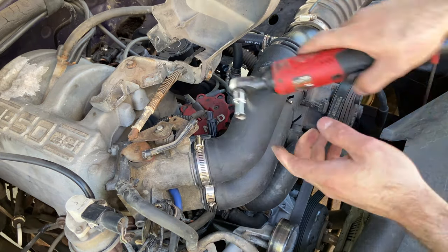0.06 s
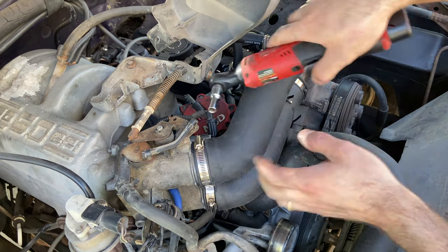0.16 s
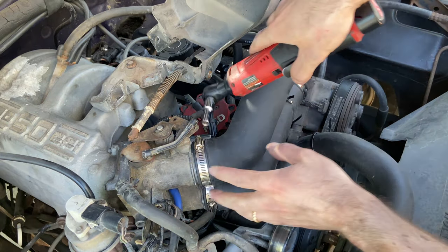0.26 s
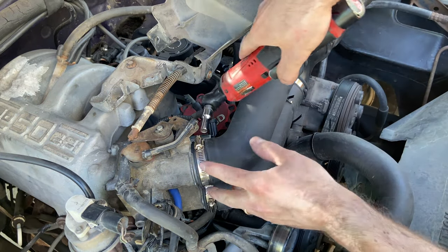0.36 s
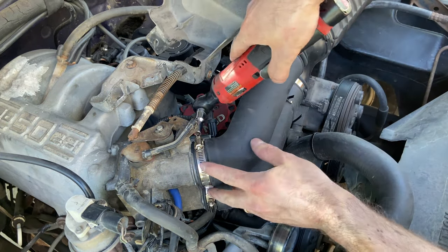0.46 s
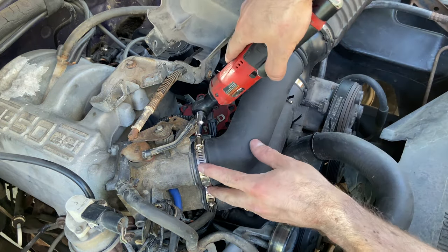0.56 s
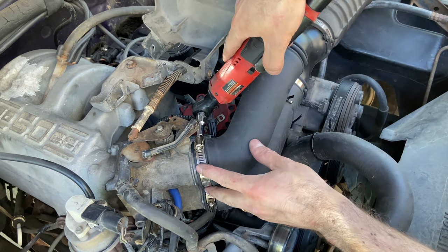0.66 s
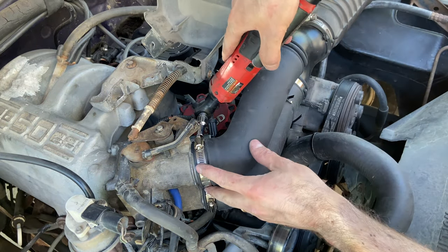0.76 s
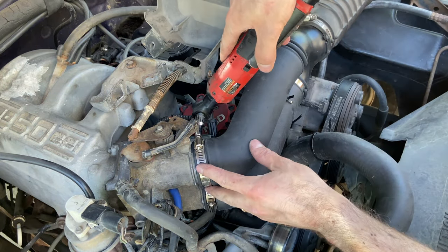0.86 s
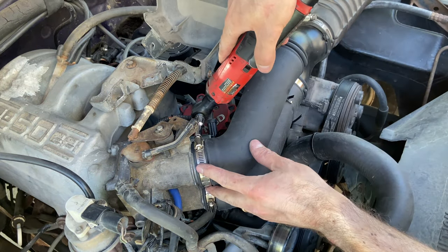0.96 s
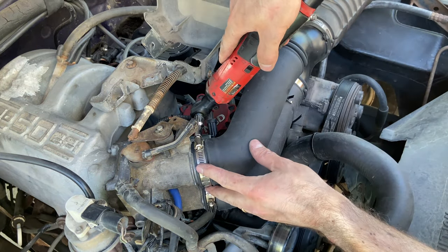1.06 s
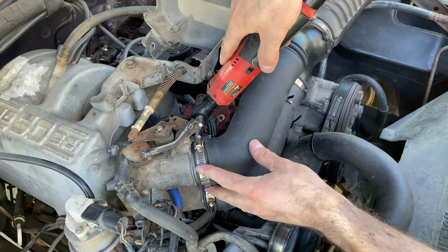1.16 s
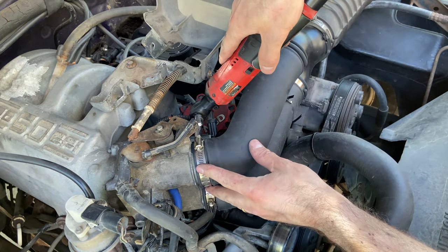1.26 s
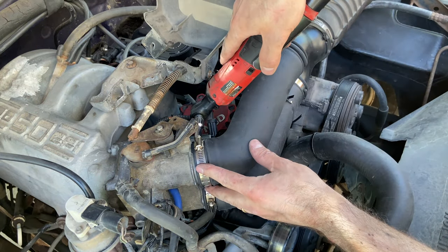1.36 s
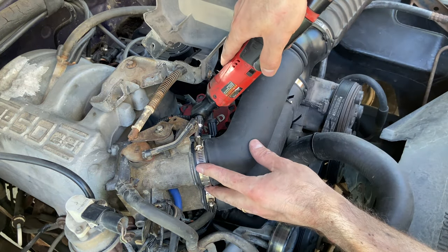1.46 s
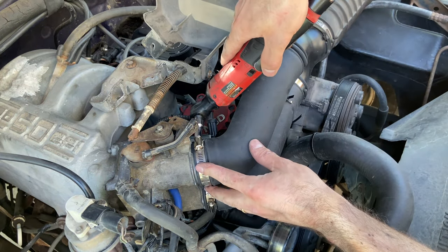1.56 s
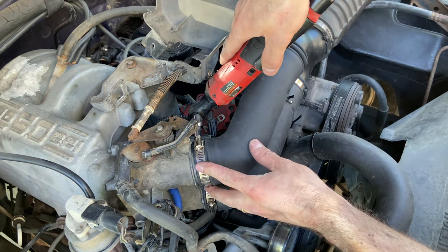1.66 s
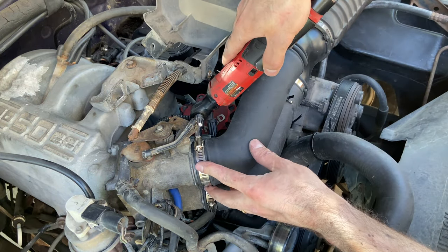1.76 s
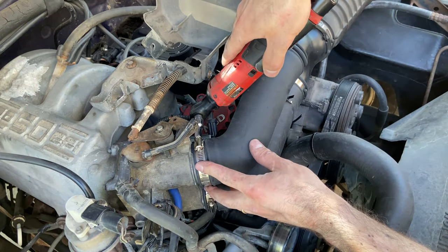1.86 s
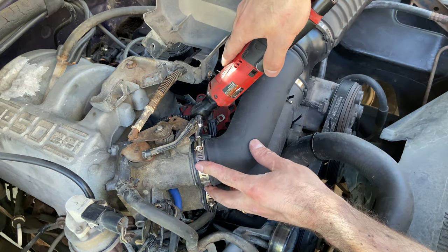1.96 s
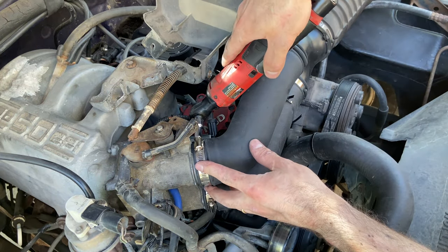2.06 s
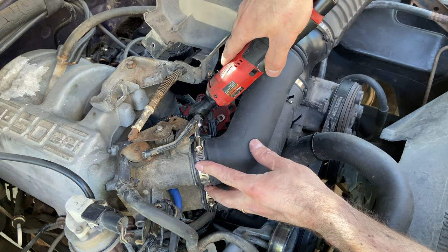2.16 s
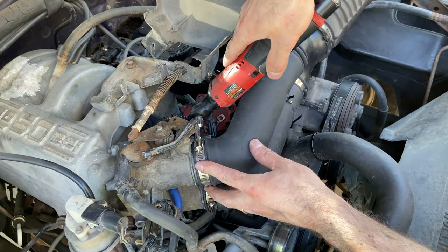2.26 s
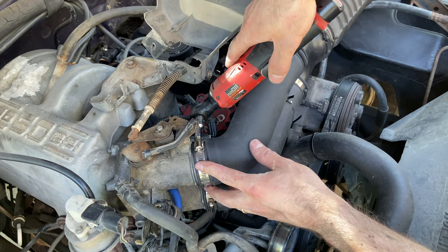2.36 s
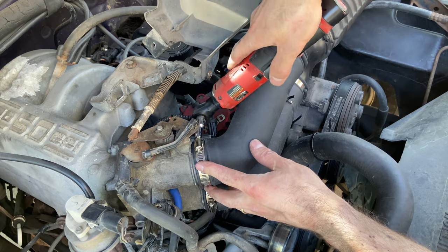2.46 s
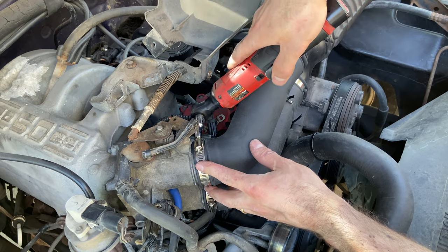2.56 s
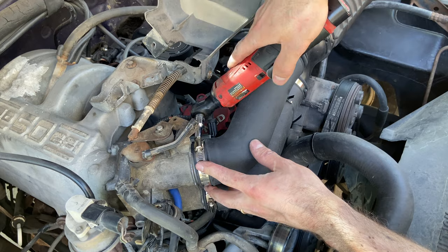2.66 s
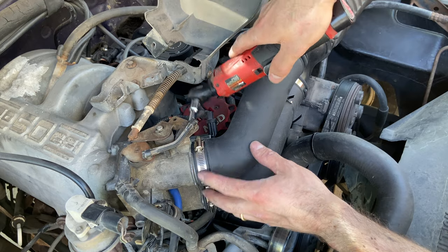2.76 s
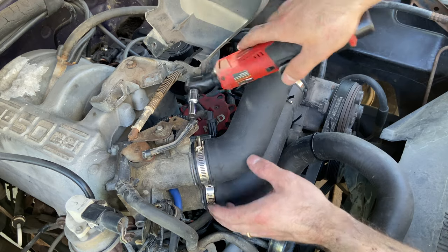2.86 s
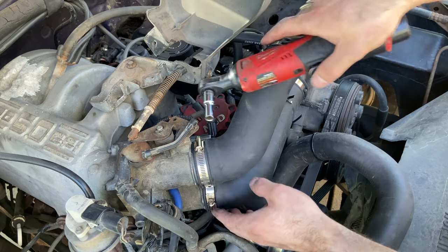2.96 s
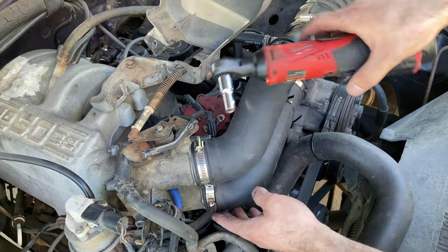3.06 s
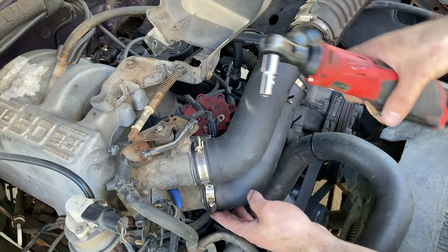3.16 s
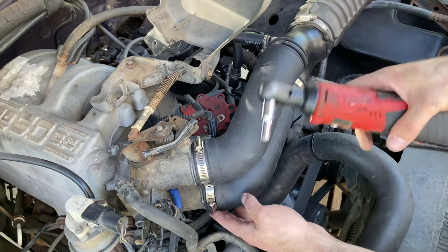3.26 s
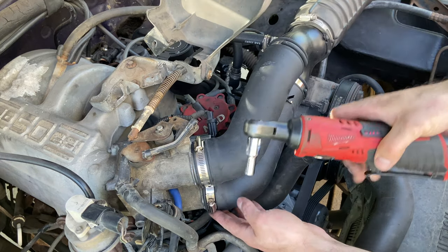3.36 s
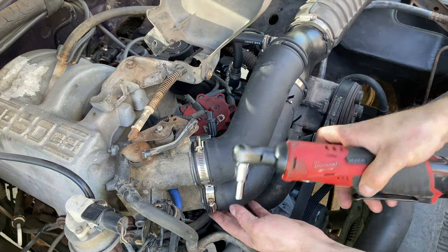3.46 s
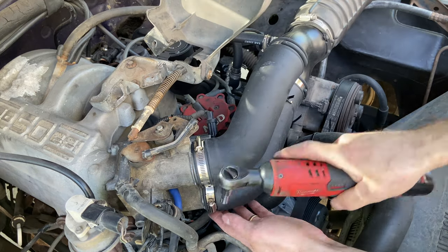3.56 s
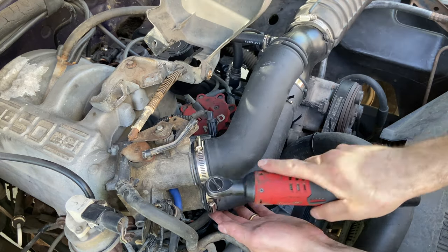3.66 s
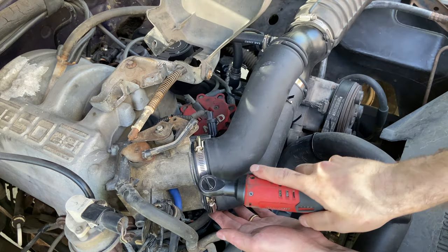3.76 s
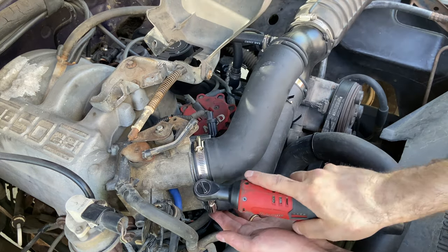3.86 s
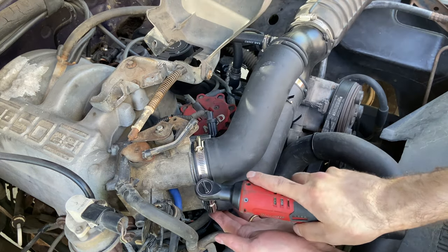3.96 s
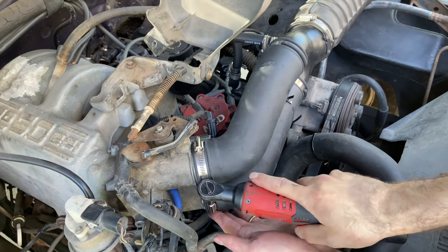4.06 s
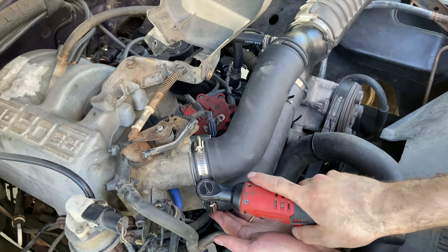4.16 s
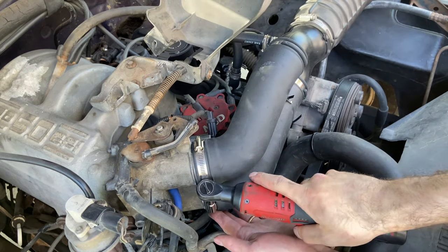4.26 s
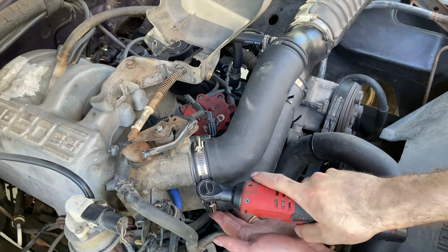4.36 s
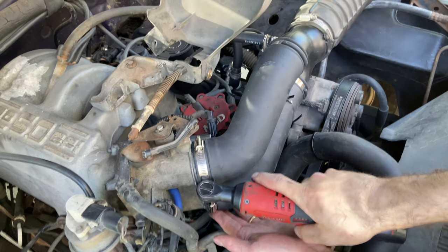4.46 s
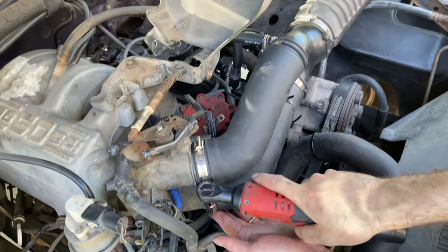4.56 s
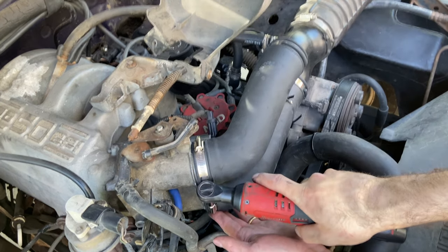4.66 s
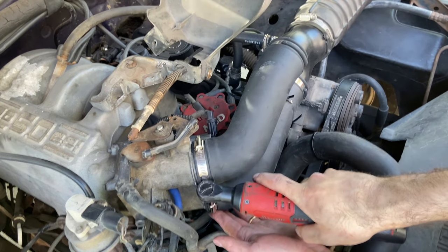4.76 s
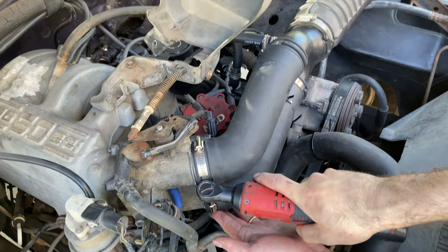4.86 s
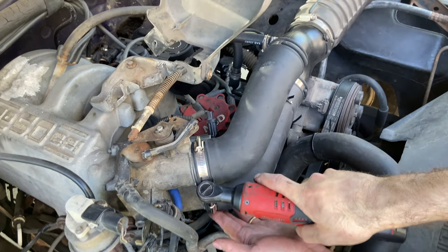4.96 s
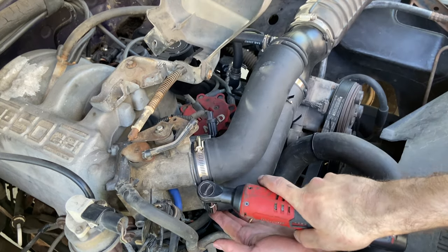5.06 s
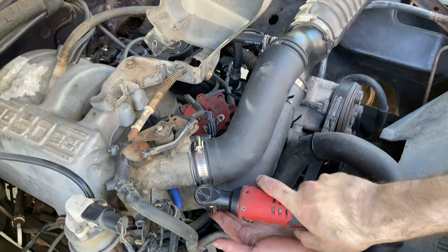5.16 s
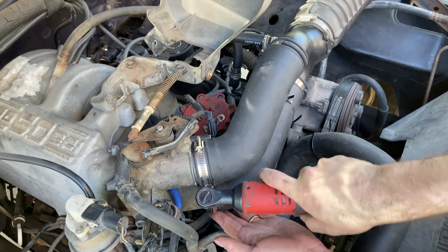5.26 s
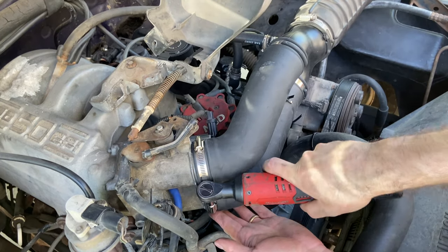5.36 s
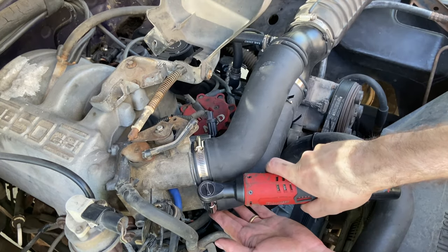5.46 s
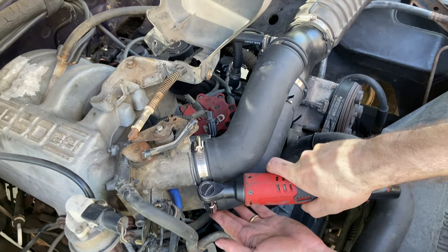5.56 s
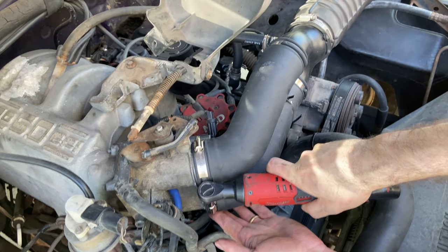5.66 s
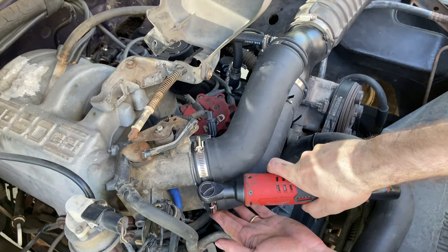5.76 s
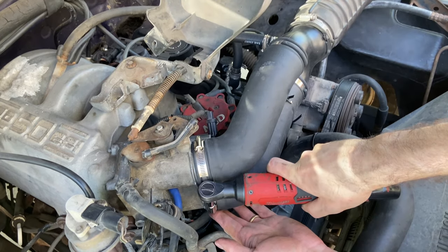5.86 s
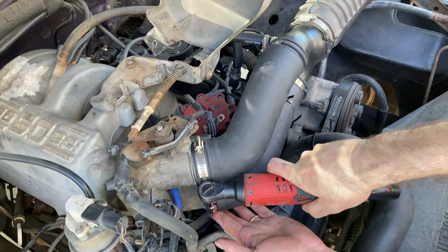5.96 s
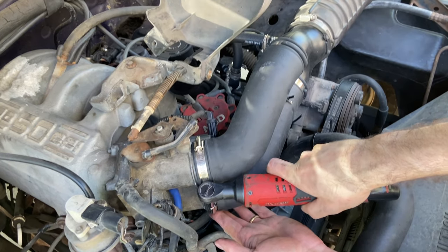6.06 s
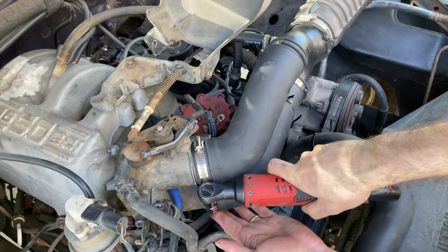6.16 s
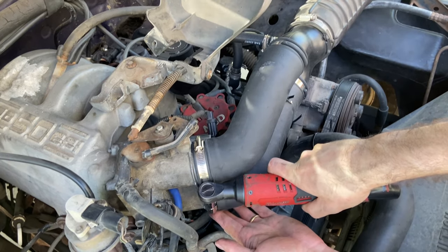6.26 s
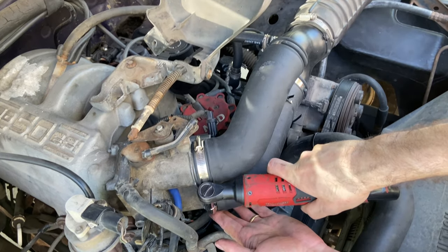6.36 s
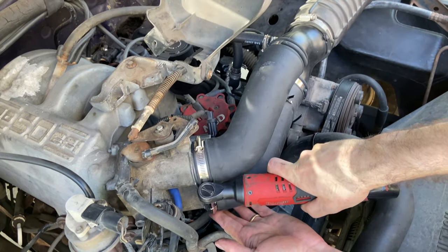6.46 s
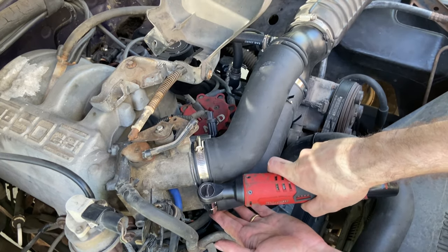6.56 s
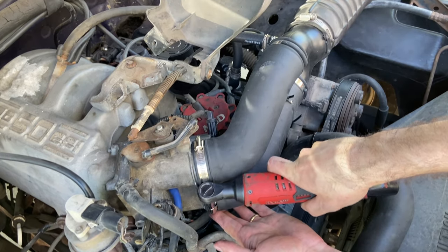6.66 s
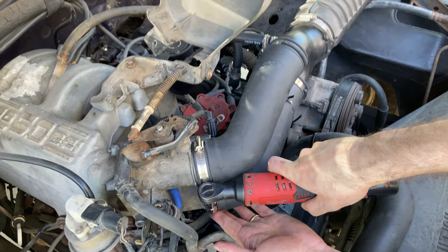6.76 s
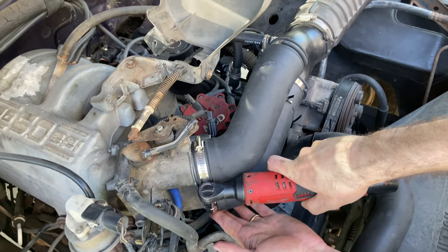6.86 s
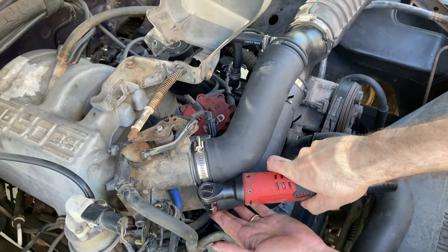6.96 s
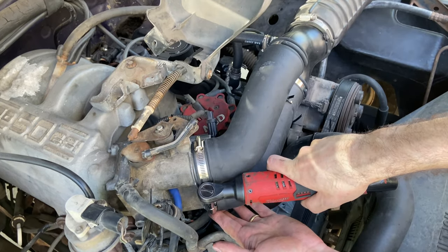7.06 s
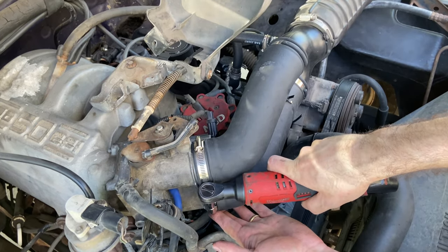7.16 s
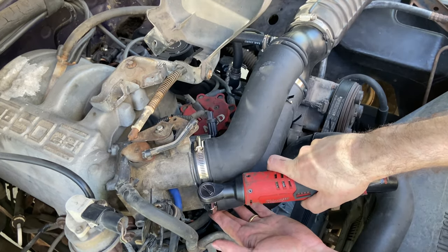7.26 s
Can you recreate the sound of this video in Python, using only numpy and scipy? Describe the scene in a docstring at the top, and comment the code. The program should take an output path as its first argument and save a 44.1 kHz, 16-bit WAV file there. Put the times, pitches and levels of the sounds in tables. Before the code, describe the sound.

Outdoors over an open engine bay, close stereo phone pickup. Fingers slide over rubber and light socket knocks lead to a cordless ratchet's loud grinding buzz, bright with steel ringing, slowing to clicks. A dull hose thump and small metal knocks fill the pause. Two further bursts follow nearly back to back, each running down to separate clicks. Soft wind flutter and faint open air lie underneath.

```python
"""Open engine bay outdoors, a phone's two microphone ports held above it in a breeze, open air far off.
First fingers slide over hose and grip, the socket knocks on the clamps and the rubber hose bumps dully.
A cordless ratchet then tightens the upper clamp: toothed gears grind, the pawl snaps and rings the steel head.
It slows to single clicks; after more knocks two runs on the lower clamp follow, each slowing in its turn.
The drive whistles as each run starts and in the last crawl; engine and bonnet scatter the sound."""
import sys
import numpy as np
from scipy import signal
from scipy.fft import rfft, irfft
from scipy.io import wavfile
from scipy.ndimage import uniform_filter1d

SR = 44100
rng = np.random.default_rng(int(sys.argv[2]) if len(sys.argv) > 2 else 0)


def transcribe(u):
    """Save the signal u as a 16-bit wav file named by the first command-line argument.

    u: samples, shape (n,) or (channels, n), limited to [-1, 1]; the rate is SR.
    q: integer samples, one column per channel.
    """
    v = np.clip(np.atleast_2d(u).T, -1, 1)
    q = np.round(v * 32767).astype(np.int16)
    wavfile.write(sys.argv[1], SR, q)


N = 322275
TIME = np.arange(N) / SR  # s
FREQ = np.fft.rfftfreq(N, 1 / SR)  # Hz

# Speed of the tool, one curve for each squeeze of the trigger. Each row: time in seconds, strokes per second.
RUN_SPEEDS = [
    [(1.072, 28), (1.15, 76.6), (1.27, 85.2), (1.4, 77), (1.7, 72.8), (1.87, 71.5), (2.03, 69.3),
     (2.11, 62), (2.2, 43.5), (2.29, 28), (2.345, 16.6), (2.42, 11)],
    [(4.372, 28), (4.44, 70), (4.48, 82.5), (4.55, 86.1), (4.72, 87.6), (4.87, 85.6), (4.97, 87.8),
     (5.1, 72.2), (5.26, 57.8), (5.41, 42.4), (5.55, 28), (5.67, 13.6), (5.75, 7)],
    [(5.808, 32), (5.86, 72.3), (5.94, 84.7), (6.22, 85.9), (6.41, 84.4), (6.5, 72.9), (6.6, 54.1),
     (6.7, 36.6), (6.8, 21), (6.89, 6.4), (6.99, 6.6), (7.07, 14.6), (7.2, 19), (7.31, 10.2)],
]
# The pawl snap at which each run drops to a crawl, in seconds; the fast snaps come whole strokes before it.
CRAWL_SNAP_S = [2.199, 5.3885, 6.678]
# Spells in which the gears sound louder than their speed alone makes them.
# Each row: start and end in seconds, extra dB.
LOUD_SPELLS = [(1.097, 1.152, 3.5), (1.086, 1.34, 2.5), (1.768, 2.304, 0.5), (4.385, 4.492, 4.5),
               (6.373, 6.478, 1.5), (6.56, 6.712, 3)]
# Resonances of the tool seated on the clamp, one list per run. Each row: Hz, width in Hz, relative level in dB.
SEAT_MODES = [
    [(495, 45, 2), (750, 50, 0), (861, 45, 5), (1105, 100, 6), (1680, 150, -3), (2385, 90, 2),
     (3220, 100, 1.5), (3550, 120, -2), (4650, 75, -2), (4880, 150, -2), (7340, 310, -6), (8010, 76, -3)],
    [(470, 30, 0), (610, 40, -1), (764, 27, 3), (950, 60, 0), (1080, 80, 3), (1550, 130, 0), (2970, 170, 2),
     (3600, 150, 4), (4480, 86, 0), (5080, 130, -1), (7630, 170, -1)],
    [(485, 30, 6), (614, 50, 3), (1030, 110, 4), (1560, 65, -2), (2125, 110, 4), (2950, 110, 3),
     (5280, 68, -4), (6430, 100, -2), (6720, 190, -1), (8100, 210, -6), (10300, 110, 0)],
]
# Colour of the gear noise on the upper clamp. Each row: frequency in Hz, relative level in dB.
GEAR_COLOUR_UPPER = [(40, -39), (90, -26.5), (280, -6.5), (390, -17.5), (500, -6), (630, -8), (850, -1),
                     (1200, 0), (1600, 2.5), (3500, 2), (7000, 0.5), (11500, 2), (12900, 4), (14300, -1),
                     (16000, 2.5)]
# Colour of the gear noise on the lower clamp. Each row: frequency in Hz, relative level in dB.
GEAR_COLOUR_LOWER = [(40, -25), (90, -5), (190, -13.5), (250, -16.5), (310, -1.5), (385, -19), (480, -7),
                     (880, -7), (1600, -2.5), (3500, -0.5), (7000, -1), (11500, 1.5), (12900, 1.5),
                     (14300, -5), (16000, 2)]
# Modes of the steel head. Each row: frequency in Hz, width in Hz, relative level in dB.
HEAD_MODES = [(10730, 130, -16), (11900, 250, -14), (12450, 200, -1), (12750, 220, 0), (13150, 280, -4),
              (13600, 260, -12), (15450, 350, -11)]
# Single pawl snaps as the tool starts, jolts or crawls. Each row: time in seconds, relative ring and crack in dB.
PAWL_SNAPS = [(1.073, -22, -23.5), (1.085, -31, -19), (1.1046, -15, -22.5), (1.123, -13, -33.5),
              (1.358, -15, -15), (1.691, -21, -21.5), (1.887, -25, -17), (2.1995, -25, -20),
              (2.224, -25, -26.5), (2.2514, -28, -19), (2.281, -24, -24.5), (2.3183, -26, -28.5),
              (2.3751, -24.5, -26), (4.374, -37, -28.5), (4.382, -18, -24), (4.3881, -15, -22.5),
              (4.4055, -12, -21.5), (4.422, -15, -16), (5.036, -26, -38), (5.3885, -23, -35),
              (5.413, -20.5, -33), (5.435, -20.5, -29), (5.462, -20, -24.5), (5.49, -20, -29),
              (5.5212, -25, -30), (5.526, -25, -38), (5.554, -23, -26.5), (5.5956, -22, -28),
              (5.645, -24, -37), (5.727, -25.5, -36), (5.811, -25, -24), (5.825, -26, -20),
              (5.837, -30, -22), (6.654, -28, -28), (6.678, -29, -25), (6.703, -32, -24),
              (6.735, -23, -29.5), (6.7687, -27, -27), (6.814, -26, -32), (6.8915, -31, -32.5),
              (7.0317, -26, -31.5), (7.104, -28, -30), (7.1637, -25.5, -29), (7.2186, -23, -27.5),
              (7.284, -22, -29.5)]
# Knocks of the yoke and the slack gears at a crawl. Each row: time in seconds, relative level in dB.
YOKE_KNOCKS = [(2.207, -21.5), (2.216, -21.5), (2.232, -19.5), (2.259, -23), (2.2715, -22.5),
               (2.292, -24.5), (2.306, -23), (2.336, -25), (2.356, -23), (2.406, -26), (5.397, -28),
               (5.42, -24.5), (5.4453, -23), (5.473, -24), (5.497, -27), (5.532, -26), (5.567, -24.5),
               (5.588, -31), (5.613, -24.5), (5.637, -28), (5.667, -24.5), (5.6984, -35), (5.786, -27.5),
               (6.663, -21), (6.688, -24), (6.715, -28), (6.73, -24.5), (6.746, -22.5), (6.763, -25.5),
               (6.788, -27), (6.807, -28.5), (6.829, -29), (6.862, -32), (6.868, -29.5), (6.947, -37),
               (7.007, -38), (7.013, -31), (7.058, -30), (7.092, -31.5), (7.1273, -26.5), (7.153, -30),
               (7.185, -30), (7.208, -29), (7.2405, -23.5), (7.268, -31)]
# Colour of dry steel-on-steel blows. Each row: frequency in Hz, relative level in dB.
CRACK_COLOUR = [(80, -9), (350, -2.5), (600, 1), (1100, 5.5), (1600, -2), (2300, 2.5), (3400, 2), (5500, 1),
                (8500, -4), (10000, 2), (10900, 1.5), (11800, -3.5), (13000, -10), (16000, -5.5)]
# The half-pressed trigger chops the motor current, which whistles. Each row: start and end in seconds,
# relative level in dB, share of each period that the current is on.
WHISTLES = [(1.051, 1.095, -31.5, .5), (4.344, 4.393, -42, .5), (5.772, 5.82, -48, 0.35),
            (6.887, 7.305, -53.5, 0.15)]
# Socket and hands against clamp, hose and engine. Each row: start in seconds, relative level in dB,
# treble tilt in dB per octave, t60 in seconds.
KNOCKS = [(0.172, -38, -14, 0.034), (0.1939, -33, -13.5, 0.034), (0.388, -54, 11, 0.025),
          (0.449, -40.5, 2.5, 0.049), (0.532, -39, -28, 0.026), (0.583, -35, 7.5, 0.026),
          (0.621, -48, 2, 0.039), (0.665, -54, 14, 0.03), (0.783, -35.5, -25, 0.063),
          (0.852, -35.5, 8.5, 0.034), (0.977, -42.5, -4, 0.026), (0.995, -41.5, 0, 0.025),
          (2.715, -41, 2, 0.088), (2.8049, -26, -5, 0.028), (2.814, -31, 2, 0.11), (2.822, -27.5, 2, 0.018),
          (3.102, -42.5, 2, 0.018), (3.187, -41, -1, 0.068), (3.289, -39, 2.5, 0.082),
          (3.438, -32, -2, 0.041), (3.759, -41, 3, 0.019), (3.879, -36, 9, 0.035), (4.015, -43, 4, 0.024)]
# Overall colour of those knocks. Each row: frequency in Hz, relative level in dB.
KNOCK_COLOUR = [(100, -36), (600, 7.5), (1000, 6.5), (2700, -2), (3600, 1), (6000, -11), (16000, -20)]
# Resonances of socket and clamp. Each row: frequency in Hz, width in Hz, relative level in dB.
SOCKET_MODES = [(1060, 110, 0), (1605, 160, -1), (2080, 250, -1.5), (2320, 200, 1), (2720, 150, 1),
                (4090, 82, -12), (4700, 170, -15), (6400, 100, -9), (6930, 510, 3.5), (9940, 390, 5.5)]
# Dull bumps of the rubber intake hose. Each row: start in seconds, relative level in dB, Hz, t60 in seconds.
HOSE_BUMPS = [(0.578, -35, 123, 0.33), (0.783, -41, 128, 0.14), (0.85, -27, 129, 0.28),
              (1.061, -50, 139, 0.088), (2.8199, -13, 178, 0.086), (3.943, -28.5, 396, 0.11),
              (4.305, -29.5, 420, 0.092)]
# Strokes of the fingers over hose and grip. Each row: centre and length in seconds, relative rub and hiss in dB.
FINGER_SLIDES = [(.01, 0.11, -48.5, -61), (.2, 0.15, -48.5, -57), (.55, 0.73, -49, -69),
                 (.98, 0.31, -49.5, -66), (3.17, 0.37, -56, -62.5), (3.32, 0.13, -61, -65),
                 (3.95, 1, -53, -67.5)]
# Faint squeaks of the socket on the clamp screw. Each row: centre and length in seconds, relative dB, Hz.
SQUEAKS = [(0.446, 0.072, -61, 6300), (0.614, .05, -61, 6720)]
# Strength of the breeze on the microphone. Each row: time in seconds, relative flutter and deep rumble in dB.
BREEZE = [(0, -67, -92), (.6, -54.5, -68), (.95, -53, -53), (1.2, -62, -70), (1.5, -61, -63),
          (2.05, -47.5, -55), (2.45, -50, -45), (3.3, -48, -50), (4.1, -48.5, -52.5), (5.4, -56, -61.5),
          (6.6, -51, -63.5), (7.31, -60.5, -57)]
# Gusts on top of it. Each row: centre and length in seconds, relative flutter and deep rumble in dB.
GUSTS = [(.79, 0.066, -41.5, -58), (1.07, 0.026, -38.5, -70), (2.16, 0.065, -38.5, -38),
         (2.43, 0.14, -48.5, -43), (2.615, 0.011, -31, -51), (2.82, 0.032, -32, -52),
         (2.91, 0.15, -46, -37.5), (3.15, 0.063, -42.5, -40), (3.26, 0.024, -36, -47),
         (3.35, 0.037, -43, -39), (3.69, 0.025, -37.5, -33.5), (3.79, 0.047, -37.5, -34.5),
         (3.98, 0.11, -40, -62), (4.38, 0.12, -41, -43.5)]
# Colour of the flutter. Each row: frequency in Hz, relative level in dB.
FLUTTER_COLOUR = [(40, -38.5), (70, -7.5), (100, 3), (140, -5.5), (200, -8.5), (300, -20), (700, -45),
                  (4000, -115)]
# Colour of the deep rumble. Each row: frequency in Hz, relative level in dB.
RUMBLE_COLOUR = [(15, -6), (30, -36.5), (50, -1.5), (68, 4.5), (100, -4.5), (300, -65.5)]
# Colour of the distant outdoor wash. Each row: frequency in Hz, relative level in dB.
OUTDOORS_COLOUR = [(25, -38), (70, -42), (130, -15), (300, 1.5), (385, -11.5), (490, 1.5), (700, -7.5),
                   (1050, -3.5), (1600, -15), (3000, -22), (6000, -32), (11000, -48.5), (16000, -78.5)]
# How much louder the left port is than the right. Each row: frequency in Hz, difference in dB.
PORT_BALANCE = [(40, -2.2), (170, 2.5), (330, 2), (620, 7), (1200, 0.1), (6000, 2.5), (11000, 0)]

FULL_SPEED, CRAWL_SPEED = 84.2, 45  # strokes per s; below the second, blows are placed one by one
GEAR_DB_PER_DOUBLING = 9.5  # of speed
HUM_ORDERS = range(2, 15)  # multiples of the stroke rate in the hum of the housing
YOKE_LAG = .34  # the yoke turns round this share of a stroke after the pawl snaps
SWING_DB, SWING_T60_S = 2.0, .009  # its knock at speed: level over the grinding of the teeth, and decay
WHISTLE_HZ = 1874
PORT_LAG_S = .000272  # direct sound from the engine bay reaches the left port this much later
OUTDOORS_DB = -53
TOP_HZ = 15800


def amp(db):
    """Decibels to gain."""
    return 10 ** (np.asarray(db) / 20)


def unit(x):
    """Scale to rms 1."""
    return x / np.sqrt(np.mean(np.abs(x) ** 2))


def curves(rows):
    """Each column of a table, joined by straight lines in time."""
    s, *columns = np.transpose(rows)
    return [np.interp(TIME, s, c) for c in columns]


def spell(start, end, edge_s):
    """Envelope that rises at start, holds, and falls at end."""
    return np.clip(np.minimum(TIME - start, end - TIME) / edge_s + .5, 0, 1)


def swells(rows):
    """For each dB column of (s, length, dB, ..) rows, the gain of bell-shaped swells."""
    s, length, *levels = np.transpose(rows)
    bells = np.exp(-np.minimum((2 * (TIME - s[:, None]) / length[:, None]) ** 2, 60))
    return [np.sqrt(amp(db) ** 2 @ bells) for db in levels]


def colour(points):
    """Frequency response through (Hz, dB) points."""
    hz, db = np.transpose(points)
    return amp(np.interp(np.log(FREQ + 1), np.log(hz), db))


def resonances(modes):
    """Frequency response of each (Hz, width, dB) mode."""
    responses = []
    for hz, width, db in modes:
        damping = 1j * FREQ * width
        responses.append(amp(db) * damping / (hz ** 2 - FREQ ** 2 + damping))
    return np.array(responses)


def shape(x, response):
    """Filter without changing the power of white noise."""
    return irfft(rfft(x) * unit(response), N)


def noise():
    """White noise."""
    return rng.standard_normal(N)


def blows(times, sizes=None):
    """One impulse for each blow, of size 1 unless sizes are given."""
    samples = np.round(np.asarray(times) * SR).astype(int)
    return np.bincount(np.clip(samples, 0, N - 1), sizes, N)


def dying(energy, t60):
    """Envelope of blows that each die away in t60 seconds."""
    return np.sqrt(signal.lfilter([1], [1, -amp(-120 / (t60 * SR))], energy + 1e-18))


def ratchet():
    """The close main source: one run on the upper clamp, then two on the lower."""
    first, second, third = (motion(table, s) for table, s in zip(RUN_SPEEDS, CRAWL_SNAP_S))
    upper = gears(first, SEAT_MODES[0], GEAR_COLOUR_UPPER, full_db=-21.5) + pawl(first, full_db=-24)
    lower = gears(second, SEAT_MODES[1], GEAR_COLOUR_LOWER, full_db=-22.5) + pawl(second, full_db=-20)
    last = gears(third, SEAT_MODES[2], GEAR_COLOUR_LOWER, full_db=-23.5) + pawl(third, full_db=-24)
    return upper + lower + last + snaps() + yoke()


def motion(table, snap_s):
    """Speed, whether the motor runs, and the count of strokes, which is whole at each snap of the pawl."""
    speed, = curves(table)
    on = (TIME > table[0][0]) & (TIME < table[-1][0])
    turn = np.cumsum(speed * on) / SR
    return speed, on, turn + np.mod(-np.interp(snap_s, TIME, turn), 1)


def each_stroke(drive, lag=0):
    """Moments when a stroke has gone the share lag of its way, while the drive runs faster than a crawl."""
    speed, on, turn = drive
    strokes = np.arange(np.ceil(turn[0]), turn[-1]) + lag
    times = np.interp(strokes, turn[on], TIME[on])
    return times[np.interp(times, TIME, speed) > CRAWL_SPEED]


def gears(drive, seat, gear_colour, full_db, count=16, tooth_t60=0.0088, tick=1.0,
          seat_db=1, hum_db=-13, crawl_db=2.5):
    """A fine rattle of teeth and one knock of the yoke in each stroke, louder with speed and in set spells."""
    speed, on, turn = drive
    # count teeth meet in each stroke, each a little early or late
    at = np.arange(np.ceil(turn[0] * count) + 1, int(turn[-1] * count)) / count
    slip = .5 * rng.standard_normal(len(at)) / count
    contacts = blows(np.interp(at + slip, turn[on], TIME[on])) / np.sqrt(speed)

    # at speed each tooth lands with a tick and grinds on for a moment; at a crawl the teeth only slide
    hard = np.minimum(speed / FULL_SPEED, 1)
    landing = hard * unit(dying(contacts ** 2, tooth_t60))
    sliding = amp(crawl_db) * np.sqrt(1 - hard ** 2) * unit(1. * on)
    swings = blows(each_stroke(drive, YOKE_LAG)) / np.sqrt(speed)
    swing = amp(SWING_DB) * unit(dying(swings ** 2, SWING_T60_S))
    grind = np.hypot(np.hypot(landing, sliding), swing) * noise()
    clatter = tick * hard * unit(contacts) + grind

    # the drive shakes the housing in step with the stroke: a faint hum that glides with the speed
    hum = np.zeros(N)
    hum[on] = sum(np.cos(2 * np.pi * (k * turn[on] + rng.random())) for k in HUM_ORDERS)
    clatter = unit(clatter) + amp(hum_db) * unit(hum * hard)

    seat_power = np.sum(np.abs(resonances(seat)) ** 2, axis=0)
    body = colour(gear_colour) * np.sqrt(1 + amp(2 * seat_db) * seat_power)
    extra_db = sum(db * spell(start, end, edge_s=0.017) for start, end, db in LOUD_SPELLS)
    gear_db = full_db + GEAR_DB_PER_DOUBLING * np.log2(speed / FULL_SPEED) + extra_db
    return shape(clatter * np.sqrt(on.mean()) * amp(gear_db), body)


def pawl(drive, full_db, scatter_db=2.5, db_per_doubling=5):
    """At speed the pawl snaps once a stroke, some snaps harder than others."""
    times = each_stroke(drive)
    speed = np.interp(times, TIME, drive[0])
    db = full_db + db_per_doubling * np.log2(speed / FULL_SPEED)
    return head_ring(times, db + scatter_db * rng.standard_normal(len(times)))


def head_ring(times, db, snap_db=-4.0, chatter_db=1.0, chatter_t60=0.035):
    """Pawl blows ring the steel head; the pawl chatters on its tooth for a moment after each snap."""
    hits = blows(times, amp(db))
    snap = hits * np.sqrt(.005 * SR)
    chatter = dying(hits ** 2, chatter_t60) * noise()
    push = amp(snap_db) * snap + amp(chatter_db) * chatter
    # neighbouring modes swing in opposite directions, so the ring swells for a moment instead of spiking
    modes = resonances(HEAD_MODES)
    return shape(push, modes[::2].sum(axis=0) - modes[1::2].sum(axis=0))


def snaps(crack_t60=0.012):
    """Single hard snaps of the pawl: a crack, and the steel head rings."""
    s, ring_db, crack_db = np.transpose(PAWL_SNAPS)
    return head_ring(s, ring_db) + cracks(s, crack_db, crack_t60)


def yoke(knock_t60=0.012):
    """At a crawl the yoke knocks at the ends of its swing, between the snaps of the pawl."""
    s, db = np.transpose(YOKE_KNOCKS)
    return cracks(s, db, knock_t60)


def cracks(times, db, t60, tick=3.2):
    """Dry steel-on-steel blows: a tick and a short grind."""
    hits = blows(times, amp(db))
    return shape(dying(hits ** 2, t60) * noise() + tick * hits, colour(CRACK_COLOUR))


def whistle(partials_db=(0, -7, -8, -10), edge_s=0.017):
    """Switching tone of the motor drive: half-on pulses give odd partials, shorter pulses even ones too."""
    out = np.zeros(N)
    for start, end, db, duty in WHISTLES:
        tone = 0
        for k, partial_db in enumerate(partials_db, 1):
            strength = amp(partial_db) * np.sin(np.pi * k * duty)
            tone = tone + strength * np.sin(2 * np.pi * k * WHISTLE_HZ * TIME)
        out += np.sqrt(2) * amp(db) * spell(start, end, edge_s) * tone
    return out


def knocks(pivot_hz=1500, socket_db=1.5, mode_scatter_db=4.5, tick=8, size=16384):
    """A tick and a short rattle; every knock rings the socket's modes in its own proportions."""
    out, t, hz = np.zeros(N + size), np.arange(size) / SR, np.fft.rfftfreq(size, 1 / SR)
    body = np.interp(hz, FREQ, colour(KNOCK_COLOUR))
    # each mode's full response, read at the frequencies of a single knock
    modes = np.array([np.interp(hz, FREQ, mode) for mode in resonances(SOCKET_MODES)])
    for s, db, tilt, t60 in KNOCKS:
        push = rng.standard_normal(size) * np.exp(-np.log(1000) * t / t60) + tick * (t == 0)
        treble = amp(tilt * np.log2(np.maximum(hz / pivot_hz, 1)))
        ring = amp(socket_db + mode_scatter_db * rng.standard_normal(len(modes))) @ modes
        knock = irfft(rfft(push) * unit(body * treble * (1 + ring)))
        out[int(s * SR):][:size // 2] += amp(db) * knock[:size // 2]
    return out[:N]


def hose(width_hz=70):
    """Dull bumps of the rubber hose: a quick throb with a soft thud around it."""
    out = 0
    for s, db, hz, t60 in HOSE_BUMPS:
        t = np.maximum(TIME - s, 0)
        throb = np.sin(2 * np.pi * hz * t)
        thud = shape(noise(), resonances([(hz, width_hz, 0)])[0] ** 2) * np.tanh(t * hz)
        out = out + amp(db) * (0.39 * throb + 0.14 * thud) * np.exp(-np.log(1000) * t / t60)
    return out


def fingers(grit_db=3):
    """The gritty slide of skin on rubber and plastic: a dull rub and a dry hiss."""
    grit = amp(grit_db * unit(uniform_filter1d(noise(), int(0.0023 * SR))))
    rub, hiss = swells(FINGER_SLIDES)
    dull = colour([(300, 20.0), (1500, 17.0), (5000, -16.5), (16000, -28.0)])
    dry_hiss = colour([(1000, -21), (2800, 6.0), (7000, -0.5), (16000, -6.5)])
    return shape(noise() * grit * rub, dull) + shape(noise() * grit * hiss, dry_hiss)


def squeaks(width_hz=160):
    """Steel slips on steel: a thin, unsteady note."""
    out = np.zeros(N)
    for s, length, db, hz in SQUEAKS:
        note = shape(noise(), resonances([(hz, width_hz, 0)])[0] ** 2)
        out += note * swells([(s, length, db)])[0]
    return out


def engine_bay(x, near_t60=0.044, far_t60=0.36, far_db=-21.5, shared=0.35, count=14, size=16384):
    """Direct sound at two ports, plus quick scatter from engine and bonnet; each blow radiates its own way."""
    t, hz = np.arange(size) / SR, np.fft.rfftfreq(size, 1 / SR)
    # scatter against direct sound: strongest near 4 kHz, faint in the top treble
    wet = np.interp(hz, FREQ, colour([(100, 9.0), (400, -6.0), (1500, 4.0), (4000, 19.0), (7500, 5.0),
                                      (9500, -14.0), (13000, -14.5), (16000, -9.0)]))
    near, far = (np.exp(-np.log(1000) * t / t60) for t60 in (near_t60, far_t60))
    tail = near + amp(far_db) * far
    lead, blow = 128, int(.007 * SR)  # samples: room ahead of the direct sound, length of one blow

    def arrive(sound, response):
        """Send a sound down one pair of paths."""
        paths = np.roll(irfft(response / np.sqrt(1 + wet ** 2)), lead, axis=1)
        return signal.oaconvolve(sound[None], paths, axes=1)[:, lead:lead + N]

    out = arrive(x, np.exp(-2j * np.pi * hz * np.array([[PORT_LAG_S], [0]])))
    # the sound wanders among count scatter patterns at constant total power
    facing = rng.standard_normal((count, N))
    for _ in range(2):
        facing = uniform_filter1d(facing, blow, axis=1)
    for share in facing / np.linalg.norm(facing, axis=0):
        scatter = rng.standard_normal((2, size)) + np.sqrt(shared) * rng.standard_normal(size)
        out = out + arrive(x * share, wet * unit(rfft(tail * scatter)))
    return out


def air(points, side_db):
    """Coloured noise, partly shared by both ports."""
    mid = shape(noise(), colour(points))
    side = shape(noise(), colour(points)) * amp(side_db)
    return np.array([mid + side, mid - side])


def breeze():
    """Moving air flutters and rumbles on the ports, rising in short gusts."""
    flutter, rumble = np.hypot(amp(curves(BREEZE)), swells(GUSTS))
    return air(FLUTTER_COLOUR, side_db=-10) * flutter + air(RUMBLE_COLOUR, side_db=0.5) * rumble


def outdoors():
    """The steady distant wash of open air: wide, coloured noise."""
    return air(OUTDOORS_COLOUR, side_db=1.5) * amp(OUTDOORS_DB)


def scene():
    """The ratchet and the hands in the engine bay, under open air."""
    tone = whistle()
    in_bay = engine_bay(ratchet() + knocks() + fingers() + squeaks() + amp(-9.5) * tone)
    # part of the whistle, and the hose, reach both ports alike
    near = in_bay + amp(-10.5) * tone + hose()
    return near + breeze() + outdoors()


def record(dry):
    """The phone's left port is fuller in the low mids; the top is cut."""
    lean = np.sqrt(colour(PORT_BALANCE))
    ports = irfft(rfft(dry) * np.array([lean, 1 / lean]), N)
    return signal.sosfilt(signal.ellip(12, .2, 80, TOP_HZ, fs=SR, output="sos"), ports)


dry = scene()
out = record(dry)
transcribe(out)
```